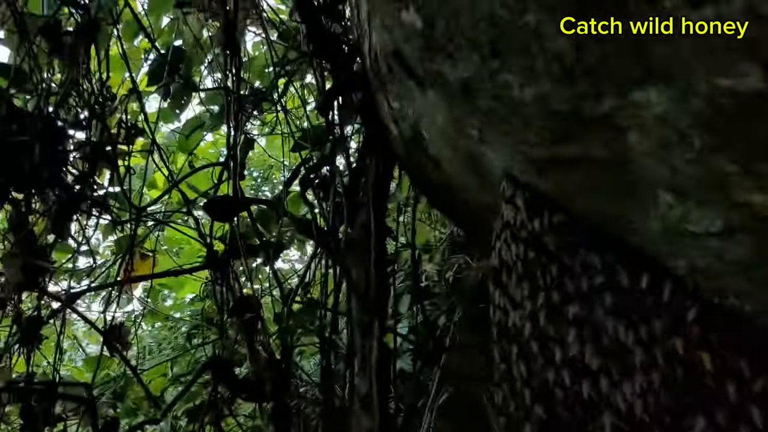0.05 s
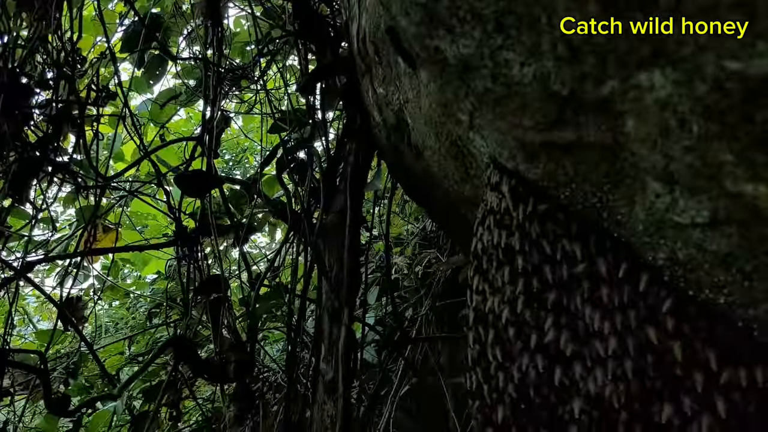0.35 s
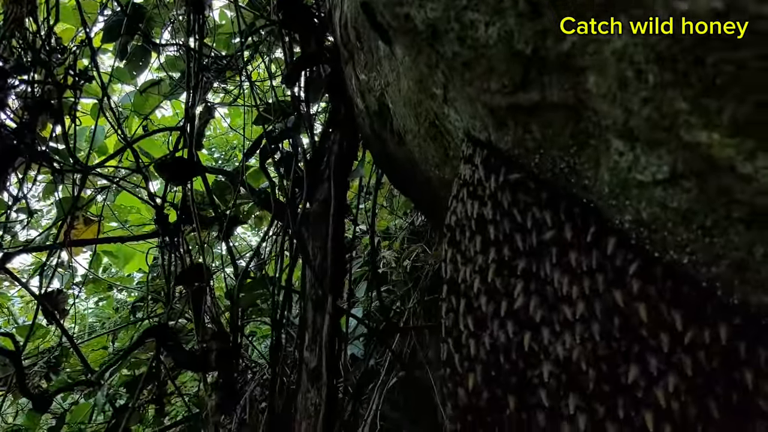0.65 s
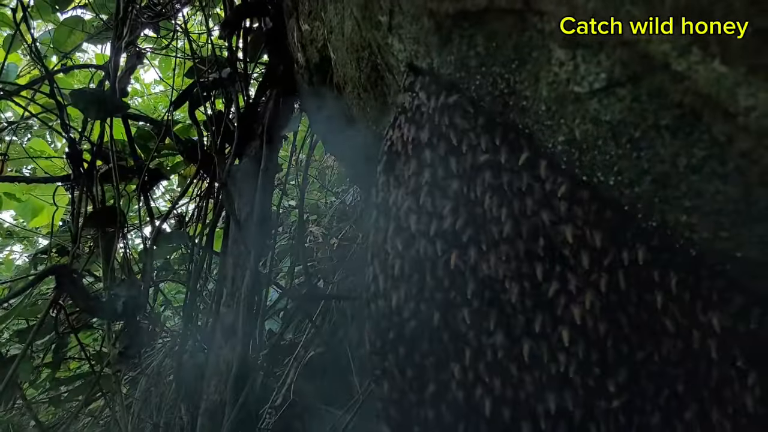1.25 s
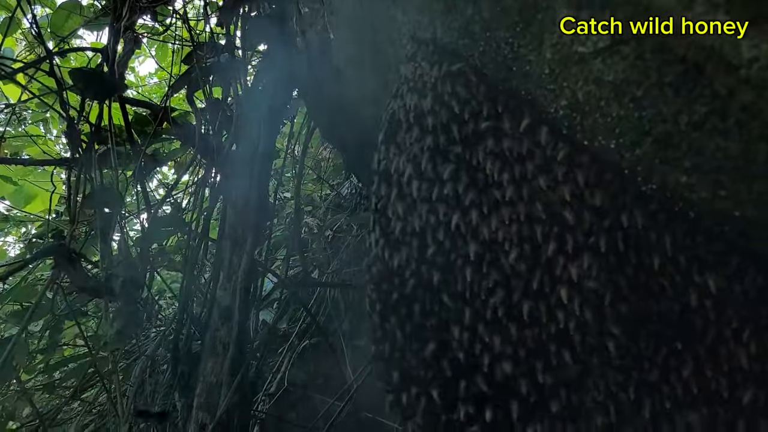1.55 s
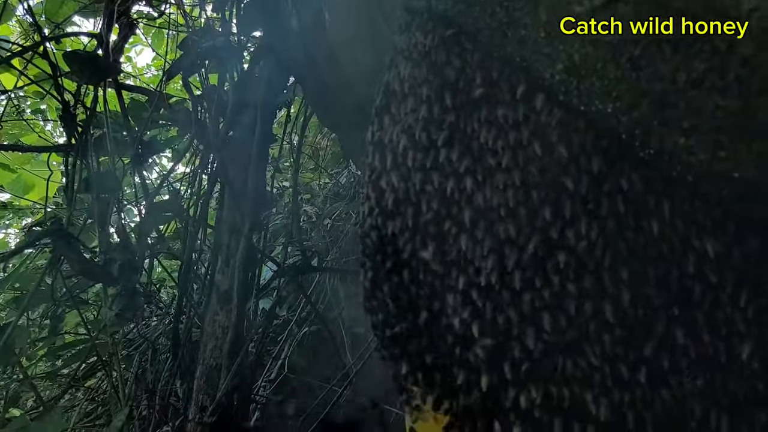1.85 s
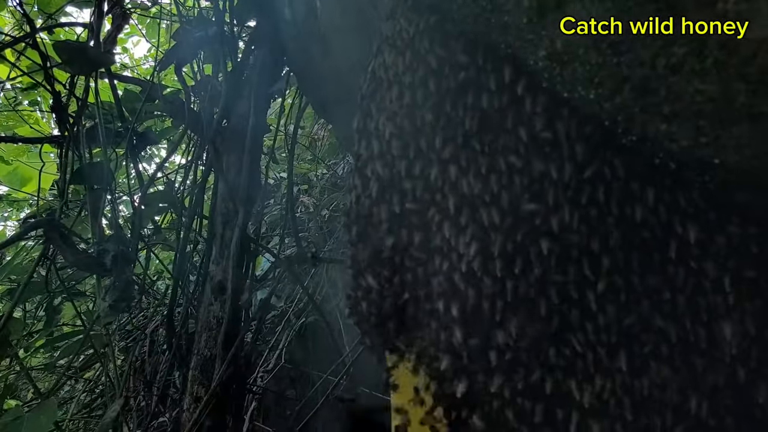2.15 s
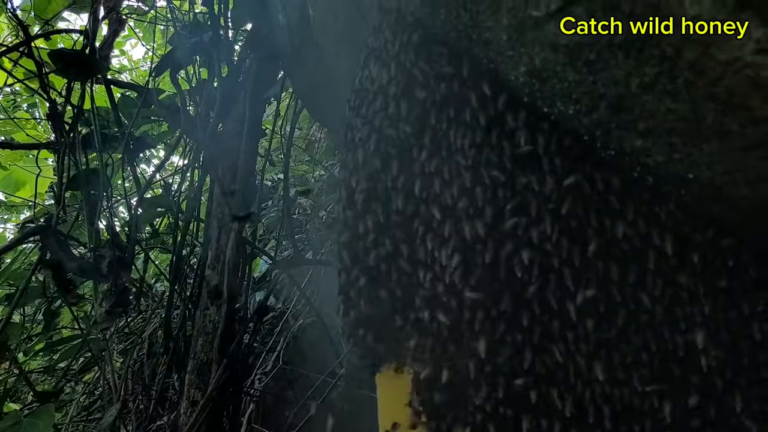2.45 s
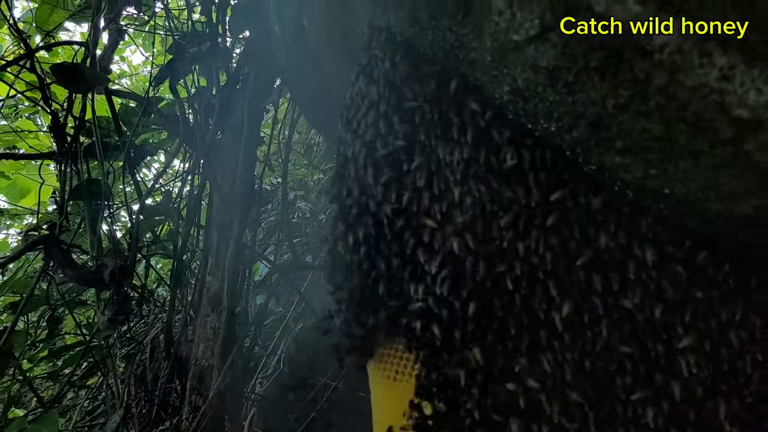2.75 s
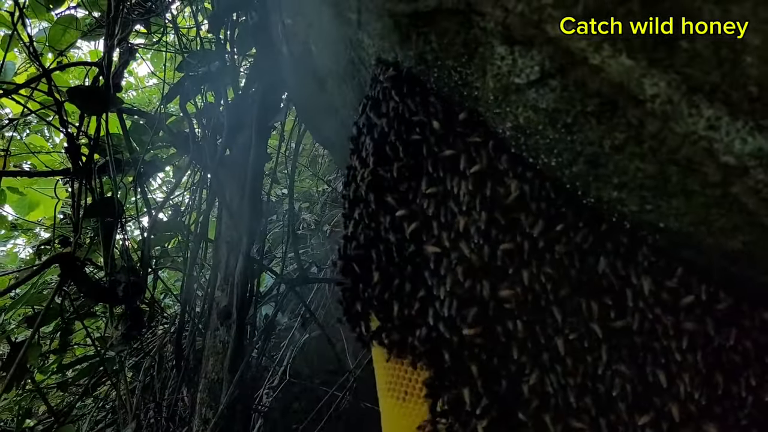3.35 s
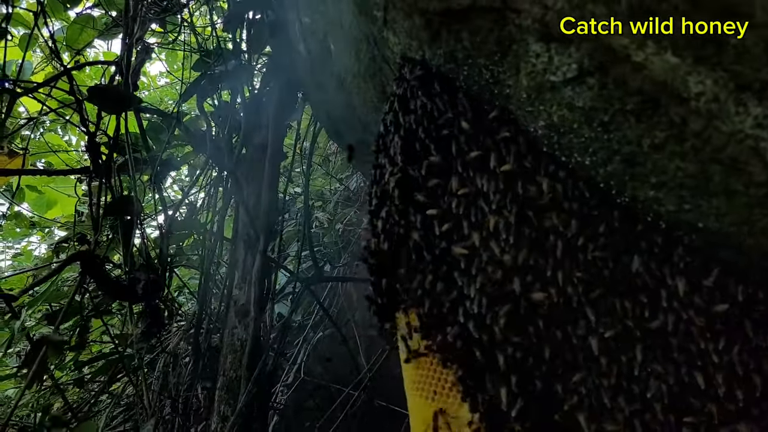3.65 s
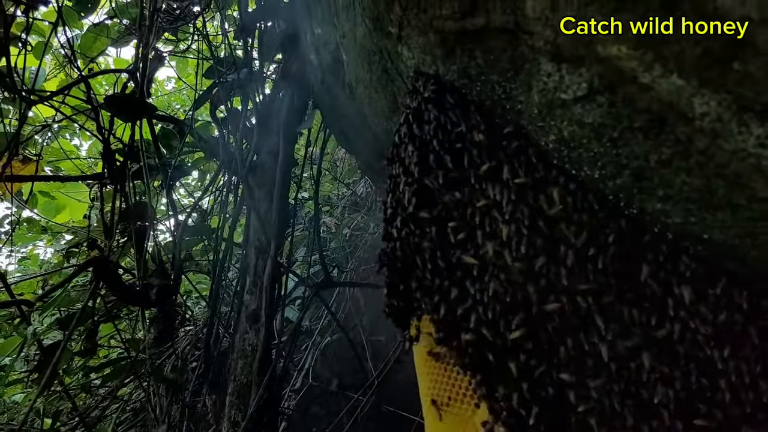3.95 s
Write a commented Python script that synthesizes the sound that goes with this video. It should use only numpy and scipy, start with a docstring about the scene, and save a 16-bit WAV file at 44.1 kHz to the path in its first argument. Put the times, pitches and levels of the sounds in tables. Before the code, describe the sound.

Dense buzzing of bees on their comb grows louder after a few microphone knocks.

```python
"""Under a rock in a forest, a hand-held stereo microphone is close to a wild bee colony on its comb.
Over a quiet hum and a thin, far whine, the microphone is bumped as it swings round: thuds and clicks.
After the bumps, the colony's sound grows louder as the recorder's gain recovers. Dozens of wingbeats near
145 Hz merge into a beating hum with a strong octave; wings and bodies rustle, the nearest bees rasp, and
air rumbles faintly at the microphone. A few faint twig-like ticks come late."""
import sys
import numpy as np
from scipy import signal
from scipy.io import wavfile
from scipy.ndimage import uniform_filter1d

SR = 44100
rng = np.random.default_rng(int(sys.argv[2]) if len(sys.argv) > 2 else 0)


def dump(signal):
    """Clip the signal to [-1, 1] and save it as 16-bit WAV at the path in sys.argv[1]."""
    limited = np.clip(np.atleast_2d(signal).T, -1, 1)
    pcm = np.round(limited * 32767).astype(np.int16)
    wavfile.write(sys.argv[1], SR, pcm)


N = 176400
TIME = np.arange(N) / SR

# mean wingbeat rate of the colony: time_s, rate_hz
WINGBEAT_RATE = [(0.2, 141.2), (0.55, 138), (0.95, 149.3), (1.7, 148.1), (2.5, 143.5), (3.2, 146.5),
                 (4.0, 141.8)]
# wingbeat fundamental, octave and upper harmonics, rising with the recorder's gain: time_s, relative_db
HUM_CURVE = [(0.18, -65), (0.53, -54.5), (0.64, -66), (0.9, -66), (0.99, -52), (1.08, -57.5), (1.3, -50.5),
             (1.48, -39.5), (1.58, -49), (1.65, -40.5), (1.72, -47.5), (1.81, -37.5), (1.85, -56),
             (1.92, -42), (2.82, -41), (2.88, -46), (3.19, -47), (3.23, -40.5), (3.42, -46), (3.7, -43),
             (3.87, -52), (4.0, -41.5)]
OCTAVE_CURVE = [(0.16, -57.5), (0.35, -52), (0.41, -63), (0.52, -46.5), (0.67, -56), (0.97, -45),
                (1.15, -47.5), (1.26, -35), (1.35, -47), (1.4, -37), (2.18, -37), (2.26, -35), (2.69, -39),
                (2.74, -33), (2.95, -38.5), (3.08, -31.5), (3.11, -46), (3.25, -32), (3.33, -37.5),
                (4.0, -39.5)]
BUZZ_CURVE = [(0.16, -59.5), (0.39, -65.5), (0.5, -58), (0.73, -62.5), (1.28, -50), (1.67, -45),
              (2.55, -44.5), (3.84, -48), (4.0, -48)]
# where the hum sits at the microphone: time_s, left_minus_right_db
HUM_BALANCE = [(0.3, -5), (0.52, -12), (0.7, -3), (1.4, -2.5), (4.0, -1)]
# air stirred by the wings: frequency_hz, relative_density_db
WASH_SPECTRUM = [(100, -4), (125, 4), (195, -7), (260, 8), (400, 1.5), (700, -1.5), (1000, -6.5),
                 (1500, -16.5), (2500, -34)]
# how alike noise is in the two channels: frequency_hz, correlation
STEREO_LIKENESS = [(40, 0.3), (150, 0.73), (400, 0.8), (700, 0.045), (1500, -.15), (3000, -0.04)]
# wings and bodies brushing: frequency_hz, relative_density_db
RUSTLE_SPECTRUM = [(500, 2.5), (1200, 0), (2200, -0.5), (5000, -2.5), (6700, -3.5), (7900, -2),
                   (8800, -6.5), (10200, -2), (12000, 1.5), (15700, 0)]
# that rustle, rising with the recorder's gain: time_s, relative_db
RUSTLE_CURVE = [(0.14, -63), (0.28, -66.5), (0.45, -66), (0.49, -62.5), (0.73, -65), (0.75, -60),
                (0.89, -63.5), (0.98, -57), (1.24, -51), (1.34, -47), (1.98, -43.5), (2.1, -45.5),
                (2.54, -44), (4.0, -48.5)]
# knocks on the microphone: start_s, thud_gain_db, cutoff_hz, left_minus_right_db, boom_db, rattle_db
MIC_BUMPS = [(0.0195, -5.5, 634, -13, 5.5, -39), (0.0411, -32, 1600, -21, -18, -47),
             (0.0912, -8.5, 460, -13.5, -11, -48), (0.1252, -34.5, 1200, -6, -18, -55.5)]
# modes of the microphone's body, the boom first: pitch_hz, relative_db, t60_s
BODY_MODES = [(71, -10, 0.16), (114, -11, 0.09), (143.7, -4.5, 0.049), (228, -11.5, 0.068),
              (483, -29, 0.12), (760, -34, 0.11), (884, -6, 0.013)]
# hard contacts on the microphone's case: start_s, left_gain_db, right_gain_db
CASE_CLICKS = [(0.0207, -27, -1.5), (0.0217, -10.5, -20), (0.042, -46, -25)]
# modes of the case: pitch_hz, relative_db, t60_s
CASE_MODES = [(2780, -16.5, 0.0029), (4150, -8, 0.0021), (5460, -24, 0.0035), (7109, -14.5, 0.0027),
              (11440, -15.5, 0.0037), (13300, -20, 0.0017)]
# air rumbling at the microphone: frequency_hz, relative_density_db
RUMBLE_SPECTRUM = [(15, -19), (30, -13), (52, 3), (80, -16.5), (110, 3)]
# loudness of that rumble: time_s, level_db
RUMBLE_CURVE = [(0.9, -73), (1.5, -66), (2.2, -62.5), (4.0, -63)]
# twig-like ticks: start_s, gain_db, pitch_hz
TWIG_TICKS = [(3.51, -39.5, 2880), (3.719, -40, 2920), (3.985, -40, 2300)]

BEE_SPREAD, WANDER = .046, .045   # shares of the wingbeat rate: between bees, within a flight
WANDER_HZ = 3.5   # pace of the wander


def from_db(db):
    """Decibels to gain."""
    return 10 ** (np.asarray(db) / 20)


def rms_one(x):
    """Scale to unit power."""
    return x / np.sqrt(np.mean(x ** 2) + 1e-20)


def in_time(rows, t=TIME):
    """Read a curve at the given times."""
    return np.interp(t, *np.transpose(rows))


def at_hz(points, hz):
    """Read a spectrum on a log-frequency axis."""
    frequencies, values = np.transpose(points)
    return np.interp(np.log(hz), np.log(frequencies), values)


def panned(db):
    """Left and right gains of mean one, the left louder by db."""
    gains = from_db(np.array([[.5], [-.5]]) * db)
    return gains / gains.mean(axis=0)


def filtered(x, hz, kind, order=2):
    """Butterworth filter."""
    return signal.sosfilt(signal.butter(order, hz, kind, fs=SR, output="sos"), x + 1e-18)


def drift(pace_hz, t=TIME):
    """A smooth random wander of about unit size."""
    steps_per_s = 500
    pole = np.exp(-2 * np.pi * pace_hz / steps_per_s)
    slow = signal.lfilter([1], [1, -2 * pole, pole * pole], rng.standard_normal(3100))[1000:]
    return np.interp(t * steps_per_s, np.arange(len(slow)), rms_one(slow))


def dying(start, t60):
    """An envelope that jumps to one and dies away."""
    return (TIME >= start) * from_db(-60 * np.clip((TIME - start) / t60, 0, 4))


def ringing(start, hz, t60):
    """A struck mode of height one."""
    return dying(start, t60) * np.sin(2 * np.pi * hz * (TIME - start))


def banded_noise(spectrum, edges_hz, flicker_db):
    """Bands of stereo noise, each with its own level, flicker and left-right likeness."""
    out, white = 0, rng.standard_normal((2, 2, N))
    for k, (low, high) in enumerate(zip(edges_hz, edges_hz[1:])):
        mid, side = filtered(white[k % 2], [low, high], "band")
        centre_hz = np.sqrt(low * high)
        alike = np.clip(at_hz(STEREO_LIKENESS, centre_hz), -1, 1)
        gain = from_db(at_hz(spectrum, centre_hz) + flicker_db * drift(12.4))
        out += gain * (np.sqrt(1 + alike) * mid + np.sqrt(1 - alike) * side * [[1], [-1]])
    return rms_one(out)


def wingbeats(bees=40, harmonics=12, nearness_db=3, steady_s=.12):
    """Each bee has its own rate, distance and direction; returns the crowd's sum for each harmonic."""
    step = 8   # samples per computed point
    t = TIME[::step]
    ranks = np.linspace(-1, 1, bees)
    offsets = BEE_SPREAD * rms_one(ranks + ranks ** 3)
    shares = np.array([1 + offset + WANDER * drift(WANDER_HZ, t) for offset in offsets])
    hz = in_time(WINGBEAT_RATE, t) * shares
    cycles = np.cumsum(hz, axis=1) * step / SR + rng.random((bees, 1))
    beat = np.exp(2j * np.pi * cycles)
    voices = from_db(nearness_db * np.array([drift(1.64, t) for _ in offsets]))   # bees come and go
    lag_s = .00012 + .00029 * rms_one(rng.permutation(ranks))   # left capsule after the right
    arrival = np.exp(1j * np.pi * np.array([[-1], [1]]) * lag_s * hz.mean(axis=1))
    layers = []
    for k in range(1, harmonics + 1):
        voices = voices * beat   # up one harmonic
        crowd = (arrival ** k @ voices).real
        power = uniform_filter1d(np.mean(crowd ** 2, axis=0), int(steady_s * SR / step))
        steady = crowd / np.sqrt(power)
        layers.append(signal.resample_poly(steady, step, 1, axis=1)[:, :N])
    return layers


def swarm(buzz_db_per_octave=-8):
    """Hum, octave and buzz of the wingbeats at the comb, with the air that they stir."""
    hum, octave, *upper = wingbeats()
    buzz = rms_one(sum(layer * from_db(buzz_db_per_octave * np.log2(k))
                       for k, layer in enumerate(upper, 3)))
    wash = banded_noise(WASH_SPECTRUM, 100 * 2 ** np.arange(0, 5, .38), flicker_db=1.6)
    out = hum * from_db(2.5 + in_time(HUM_CURVE))
    out += octave * from_db(1 + in_time(OCTAVE_CURVE))
    out += (from_db(-1.5) * buzz + from_db(2) * wash) * from_db(in_time(BUZZ_CURVE))
    return out * panned(in_time(HUM_BALANCE))


def rustle():
    """Thousands of wings and bodies brushing together make a smooth, bright hiss."""
    edges_hz = np.r_[np.geomspace(500, 6000, 9), np.geomspace(6000, 17500, 11)[1:]]
    hiss = banded_noise(RUSTLE_SPECTRUM, edges_hz, flicker_db=1.13)
    return hiss * from_db(4 + in_time(RUSTLE_CURVE) + .46 * drift(30))


def rasp(bees=4, band_hz=(2930, 5000), swell_db=13):
    """The bees nearest the microphone: a puff of wing noise each beat, swelling as they come and go."""
    out = 0
    for _ in range(bees):
        share = 1 + BEE_SPREAD * rng.standard_normal() + WANDER * drift(WANDER_HZ)
        hz = in_time(WINGBEAT_RATE) * share
        puffs = np.sin(np.pi * np.cumsum(hz) / SR) ** 6
        swell = from_db(swell_db * np.minimum(drift(4.9), 2))
        out += puffs * swell * filtered(rng.standard_normal((2, N)), band_hz, "band")
    return rms_one(out) * from_db(in_time(BUZZ_CURVE) - 15)


def whine(pitch_hz=2350, end_s=.66, fade_s=.17):
    """A thin tone far off to the left, perhaps an insect, that fades early."""
    tone = np.sin(2 * np.pi * np.cumsum(pitch_hz + 22 * drift(35)) / SR)
    fade = np.clip((end_s - TIME) / fade_s, 0, 1)
    return from_db(-79.5 + 3.3 * drift(15)) * tone * fade * panned(9)


def mic_bumps(rattle_cutoff_hz=1430, rattle_t60_s=.16):
    """Soft knocks ring the low modes of the microphone's body and leave a short rattle."""
    out = 0
    for start, thud_db, cutoff_hz, pan_db, boom_db, rattle_db in MIC_BUMPS:
        ring = 0
        for k, (hz, mode_db, t60) in enumerate(BODY_MODES):
            gain = from_db(mode_db + boom_db * (k == 0))
            ring += gain * dying(start, t60) * np.cos(2 * np.pi * hz * (TIME - start))
        softened = filtered(ring, cutoff_hz, "low", order=3)
        thud = filtered(softened, 90, "high")   # the body does not pass slower pushes
        noise = filtered(rng.standard_normal((2, N)), rattle_cutoff_hz, "low", order=1)
        rattle = rms_one(noise) * dying(start, rattle_t60_s)
        out += from_db(rattle_db) * rattle - from_db(thud_db) * thud * panned(pan_db)
    return out


def case_clicks():
    """Hard contacts set the microphone's small, stiff case ringing for a few milliseconds."""
    out = 0
    for start, left_db, right_db in CASE_CLICKS:
        ring = sum(from_db(db) * ringing(start, hz, t60) for hz, db, t60 in CASE_MODES)
        out += from_db([[left_db], [right_db]]) * ring
    return out


def air_rumble():
    """Air at the microphone makes a faint, uneven rumble under the hum."""
    rumble = banded_noise(RUMBLE_SPECTRUM, 14 * 2 ** np.arange(0, 3.1, .5), flicker_db=-5)
    return rumble * from_db(in_time(RUMBLE_CURVE)) * panned(-2)


def ticks(snap_band_hz=(2200, 4400)):
    """Tiny twig-like snaps, each with a short, soft ring."""
    out = 0
    for start, db, hz in TWIG_TICKS:
        noise = filtered(rng.standard_normal((2, N)), snap_band_hz, "band")
        snap = from_db(2.5) * rms_one(noise) * dying(start, t60=.008)
        out += from_db(db) * (snap + ringing(start, hz, t60=.011))
    return out


def scene():
    """The colony and the small sounds around the microphone."""
    colony = swarm() + rustle() + rasp()
    return colony + air_rumble() + whine() + mic_bumps() + case_clicks() + ticks()


def record(dry, cutoff_hz=15850):
    """The recorder clips peaks just under full scale and cuts the top steeply."""
    lowpass = signal.firwin(601, cutoff_hz, fs=SR, window=("kaiser", 8))
    return signal.fftconvolve(np.clip(dry, -.93, .93), lowpass[None], mode="same", axes=1)


dry = scene()
out = record(dry)
dump(out)
```